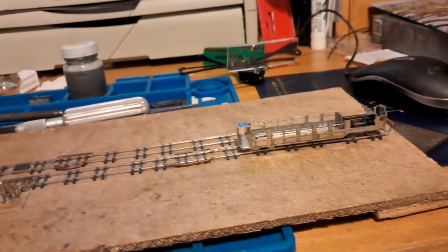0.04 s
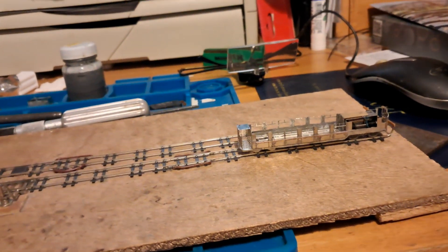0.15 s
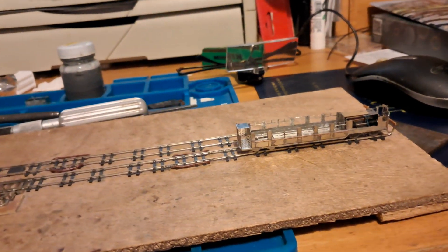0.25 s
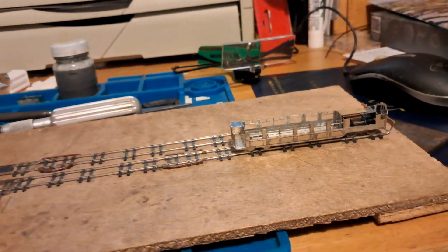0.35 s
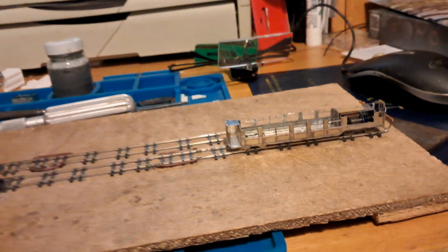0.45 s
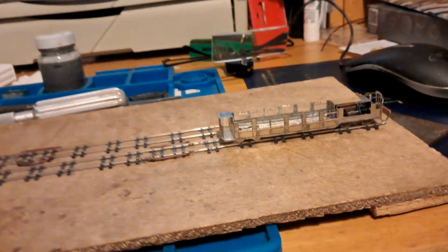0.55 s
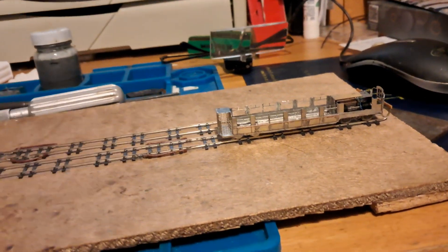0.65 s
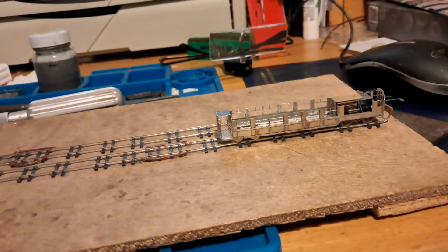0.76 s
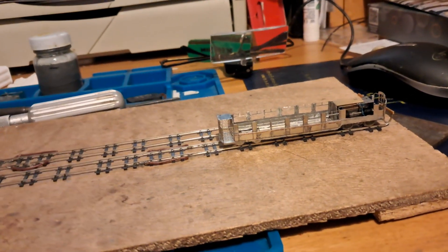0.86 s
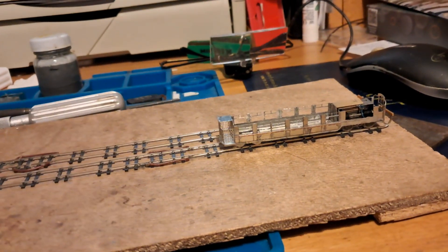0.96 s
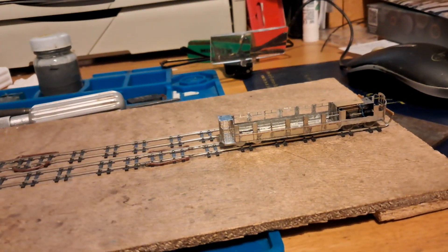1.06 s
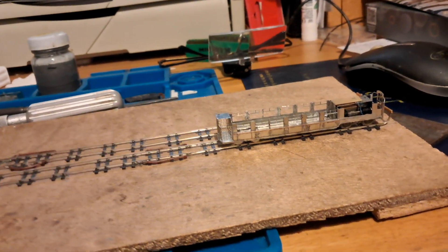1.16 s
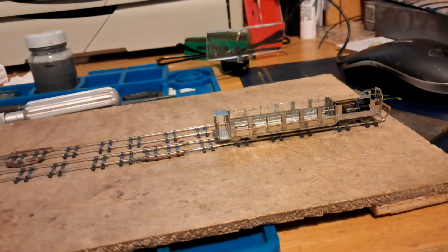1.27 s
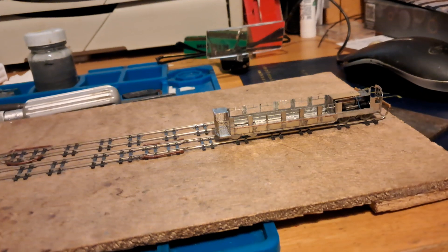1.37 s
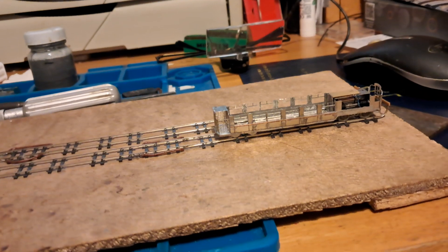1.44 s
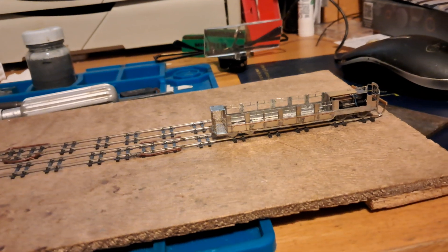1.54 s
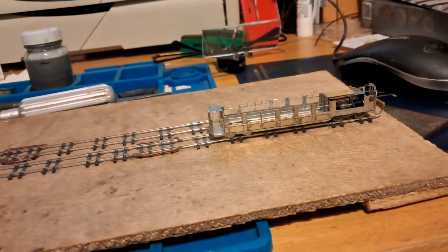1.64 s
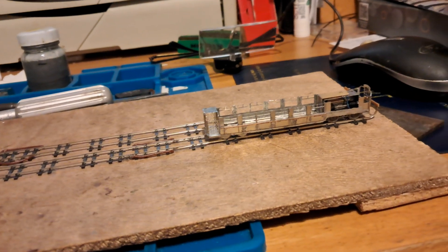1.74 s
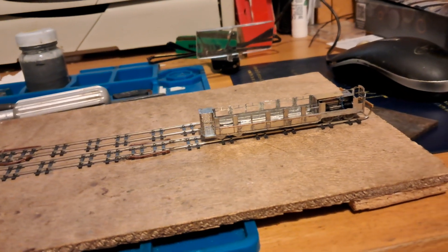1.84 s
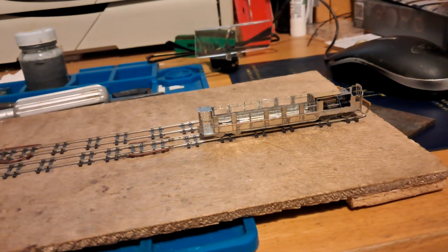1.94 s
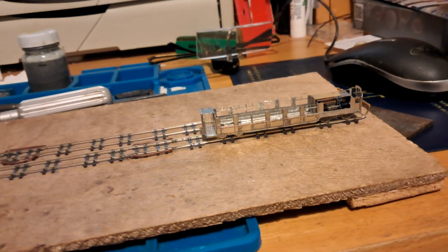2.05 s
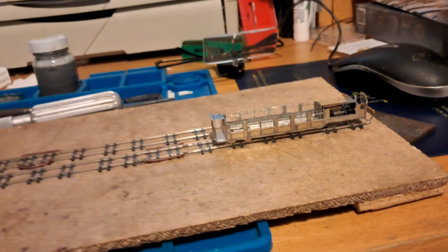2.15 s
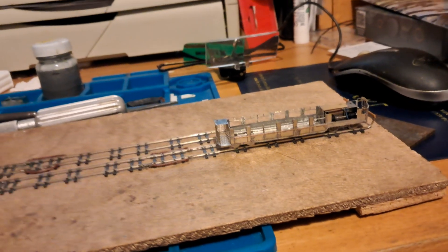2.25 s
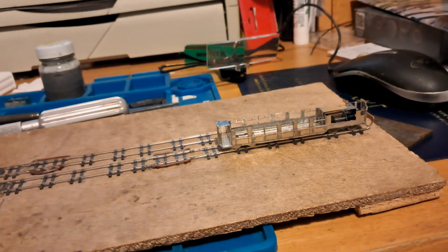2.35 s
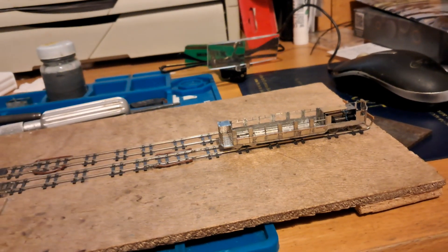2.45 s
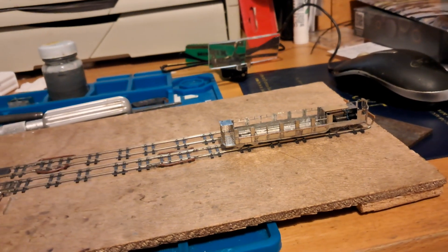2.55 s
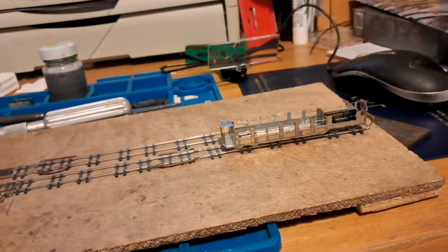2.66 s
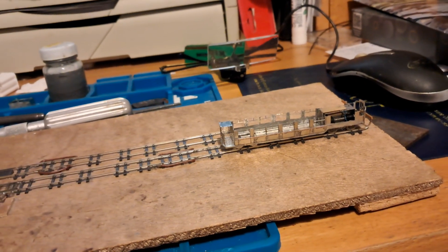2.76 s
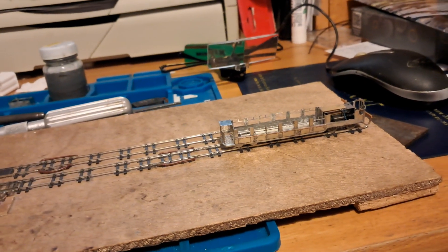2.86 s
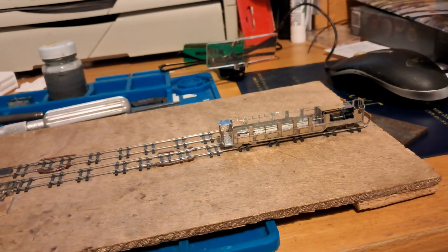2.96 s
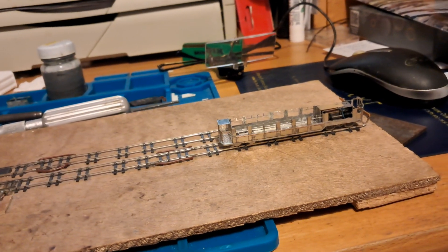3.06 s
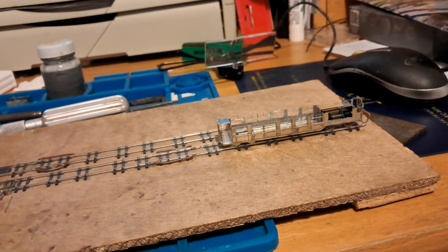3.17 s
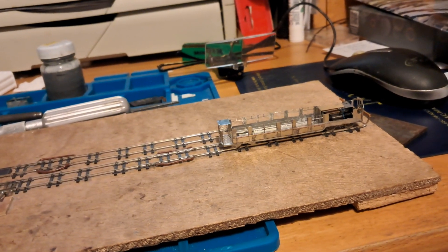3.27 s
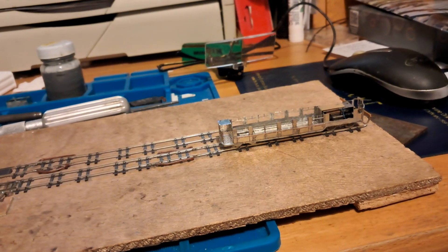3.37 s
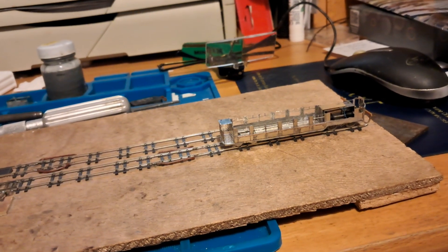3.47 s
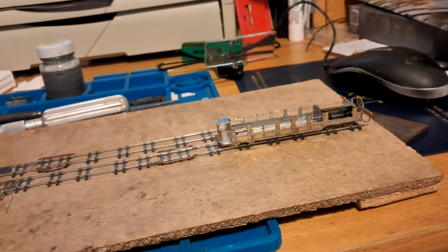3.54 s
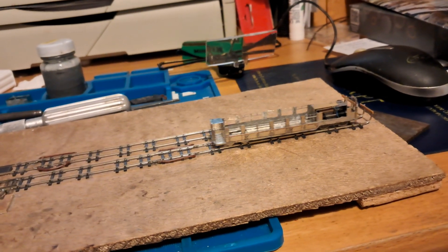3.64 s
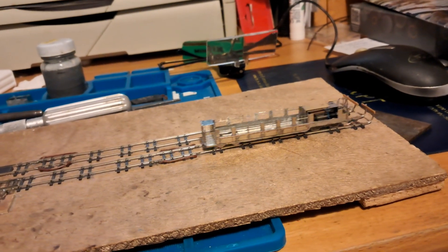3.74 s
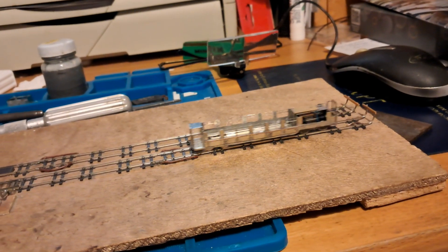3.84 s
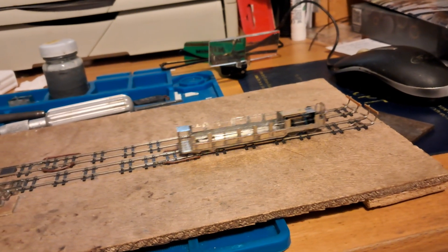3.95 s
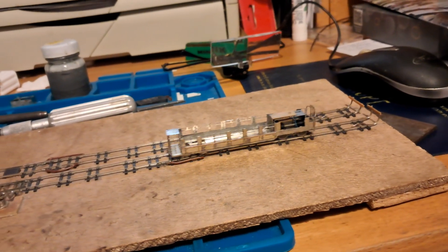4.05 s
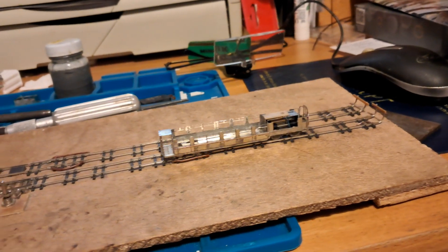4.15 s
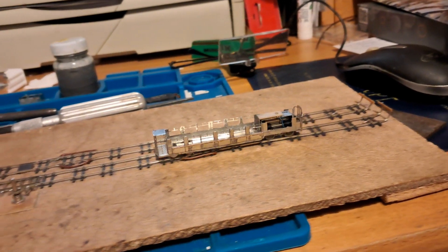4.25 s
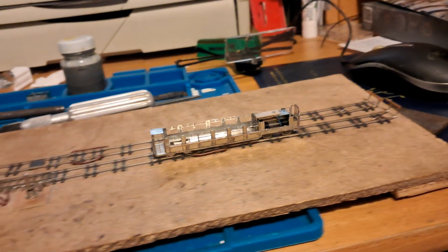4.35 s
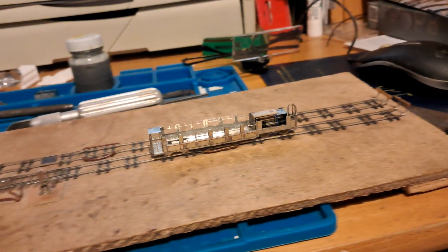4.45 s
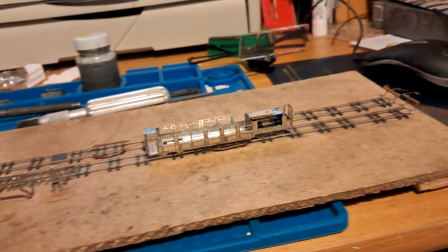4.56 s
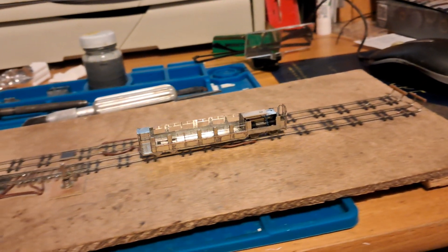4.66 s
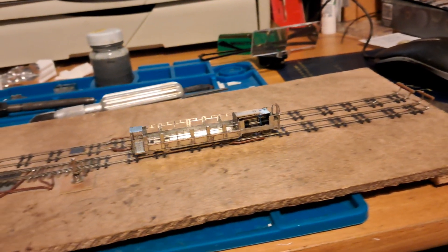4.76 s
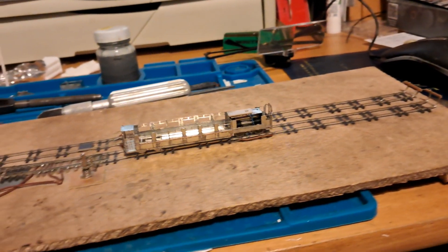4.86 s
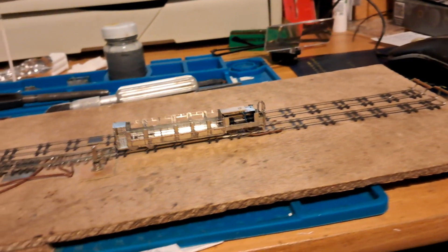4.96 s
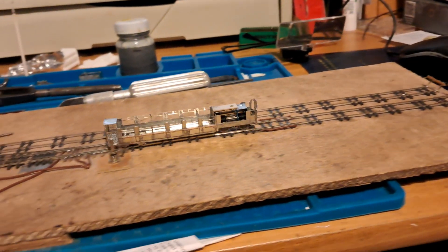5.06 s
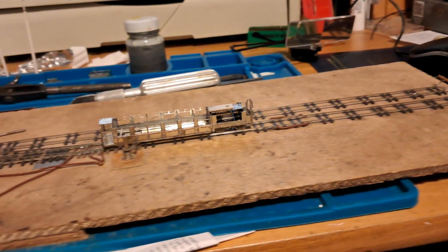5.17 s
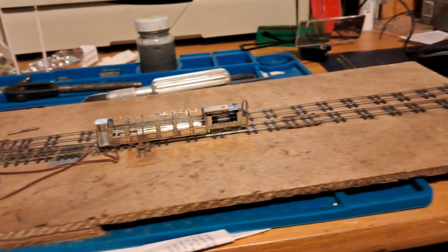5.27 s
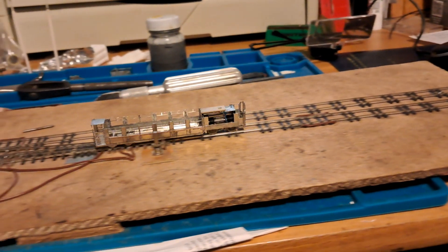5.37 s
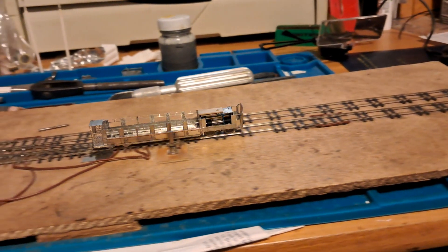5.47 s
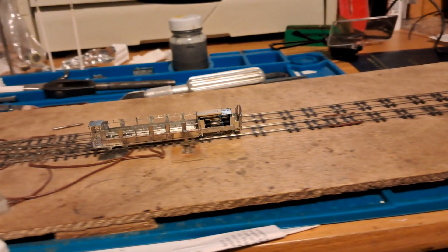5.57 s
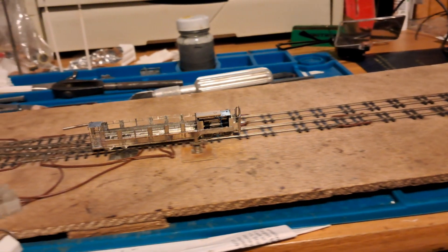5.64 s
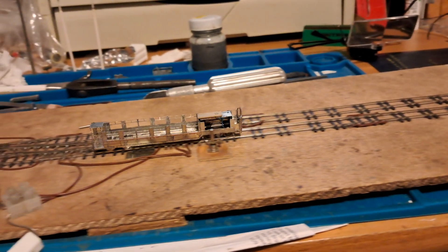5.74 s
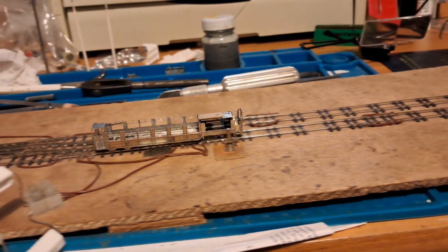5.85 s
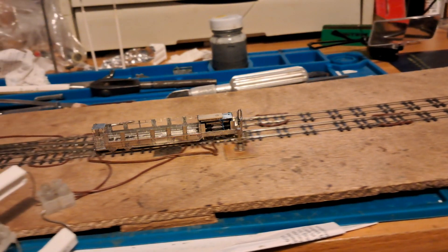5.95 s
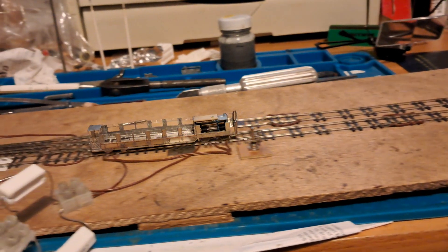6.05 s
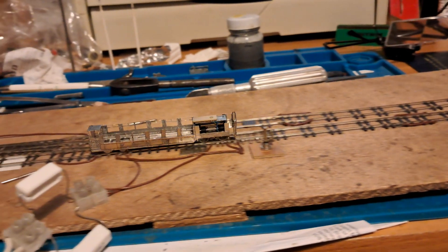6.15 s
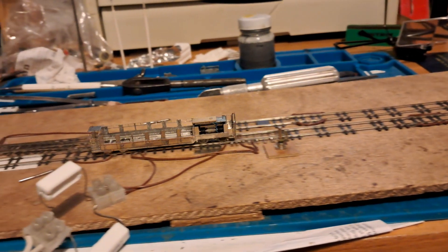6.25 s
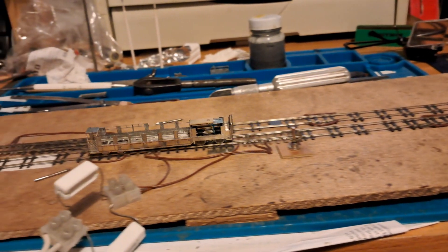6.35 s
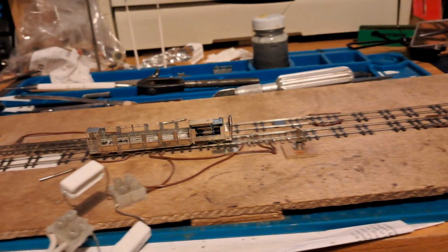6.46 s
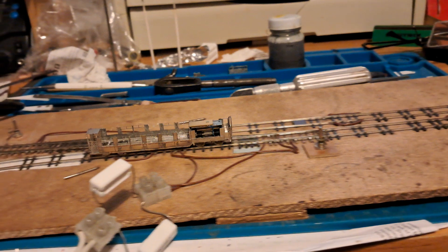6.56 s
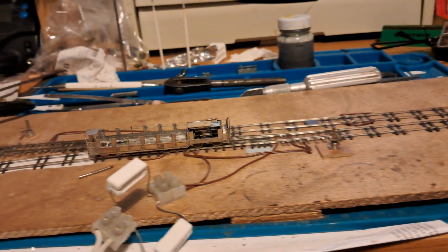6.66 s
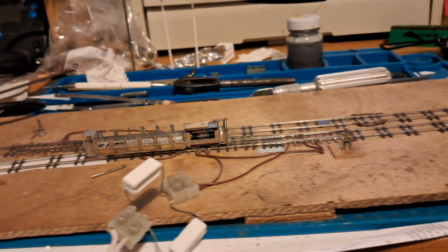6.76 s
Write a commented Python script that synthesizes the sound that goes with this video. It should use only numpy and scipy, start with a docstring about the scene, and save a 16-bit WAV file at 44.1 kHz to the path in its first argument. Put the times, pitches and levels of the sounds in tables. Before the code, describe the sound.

Two sharp switch clicks and faint touches on a controller break the low hum of a small room. A soft low tone passes briefly, then a model rail car sets off, heard from close by. Its little gears chatter in a steady, tinny whirr that resonates through the wooden board beneath, with high wheel hiss and small jolts. The running sound eases slightly midway, then grows fuller, drifting a little to the right.

```python
"""A small brass model rail car runs along its track on a wooden board, close by.
Backlash makes its gear teeth collide, driving the resonances of board, chassis and brass shell;
the wheels hiss by sliding friction, jolt over the rails and bind here and there.
Before the motor starts, a switch clicks twice, the controller is lightly handled and a soft low tone
passes. Behind it all lies a quiet workroom with a faint hum."""
import sys
import numpy as np
from scipy import signal
from scipy.fft import rfft, irfft
from scipy.io import wavfile
from scipy.ndimage import uniform_filter1d, map_coordinates

SR = 44100
rng = np.random.default_rng(int(sys.argv[2]) if len(sys.argv) > 2 else 0)


def unload_audio(sound):
    """Save the sound as a 16-bit wav file, at the path given as the first command line argument."""
    columns = np.transpose(np.atleast_2d(sound))
    # keep every value between -1 and 1, then stretch to whole-number steps
    steps = np.round(np.clip(columns, -1, 1) * 32767)
    wavfile.write(sys.argv[1], SR, steps.astype(np.int16))


N = 300321
T = np.arange(N) / SR
FFT_SIZE = 2 ** 19
HZ = np.maximum(np.fft.rfftfreq(FFT_SIZE, 1 / SR), 1)
MOTOR_START_S = 3.546
RUNNING_S = np.maximum(T - MOTOR_START_S, 0)

# How hard the gears work. Each row: time in seconds, relative level in dB.
GEAR_LOAD = [(3.6, -32), (3.89, -35), (4.09, -32.5), (4.51, -34.5), (4.54, -37.5), (4.86, -38.5),
             (5.16, -40), (5.39, -36), (5.57, -38), (6.01, -32.5), (6.58, -32), (6.76, -33)]
# The board answers more as the car rolls in from its end. Each row: time in seconds, gain in dB.
BOARD_COUPLING = [(3.6, -21), (4.0, -17), (4.25, -9.5), (4.9, -9.5), (5.55, -3.5), (6.15, -4.5), (6.8, -3)]
def rail_car(spin_up_s=0.027, dead_spot_s=5.14, dead_half_s=0.17, grit_db=-12, hiss_db=-42):
    """Forced vibration: one gear chatter drives every part of the car in step with the load."""
    (load_db,), (coupling_db,) = curves(GEAR_LOAD), curves(BOARD_COUPLING)
    # Over a dead spot the board hardly rings and the chassis is damped too.
    dead_spot = np.exp(-((T - dead_spot_s) / dead_half_s) ** 4)
    board_gain = undb(load_db + coupling_db - 11.5 * dead_spot)
    chassis_gain = undb(load_db - 6.5 - 15 * dead_spot)
    shell_gain = undb(load_db[0] + 1.038 * (load_db - load_db[0]) - 6)
    spin_up = np.clip(RUNNING_S / spin_up_s, 0, 1) ** 2
    chatter = gear_chatter() * spin_up
    gritty = chatter + undb(grit_db) * rail_grit() * spin_up
    thud, clink = wheel_jolts()
    ringing = ringing_parts(board_force=chatter * (board_gain + thud),
                            chassis_force=chatter * chassis_gain + clink * undb(-4),
                            shell_force=gritty * shell_gain + clink)
    hiss = wheel_hiss(gritty * undb(hiss_db) + clink * undb(-8))
    return ringing + hiss + bench_rumble(chatter, board_gain)


# The motor's speed. Each row: time in seconds, nominal turns per second.
MOTOR_SPEED = [(3.54, 48.2), (3.65, 100.7), (4.3, 104.2), (5.1, 117), (5.6, 102), (6.1, 107.5),
               (6.8, 103.2)]
def gear_chatter(teeth=12, backlash=.35, gear_ratio=5.2, shaft_db=3.5, wheel_db=1.8, room_db=-2):
    """Backlash: teeth strike early or late, harder once a motor turn and once a wheel turn."""
    speed, = curves(MOTOR_SPEED)
    turns = np.cumsum(speed * (1 + .03 * wander(14))) / SR
    tooth = np.arange(int(turns[-1] * teeth))
    late, strength, flank = rng.standard_normal((len(tooth), 3)).T
    hits = np.searchsorted(turns, (tooth + backlash * late) / teeth).clip(0, N - 1)
    blows = unit(np.bincount(hits, undb(4 * strength) * np.sign(flank), N))  # either flank may hit
    sliding = 0.7 * rng.standard_normal((2, N))
    angle = 2 * np.pi * turns
    pressure = undb(shaft_db * np.cos(angle) + wheel_db * np.cos(angle / gear_ratio))
    out = sliding * pressure
    # Paths to the ears and echo patterns crossfade as the car travels.
    travel = turns / 22
    for pace in (1, np.sqrt(3)):
        for wave in (np.cos, np.sin):
            direct = scatter(blows * pressure, delay_s=0.000902)
            echoes = undb(room_db) * room((blows + sliding[0]) * pressure)
            out += wave(travel * pace) / np.sqrt(2) * (direct + echoes)
    return spread(unit(out))


# Modes of the wooden board, the chassis and the brass shell.
# Each row: frequency in Hz, bandwidth in Hz, relative level in dB, left minus right in dB.
BOARD_MODES = [(515.7, 79, -24.5, 1), (644, 45, -20, 0), (758, 25, -10.5, 7), (871.5, 41.5, 2.5, 1.5),
               (976, 90, -7, 4.5)]
CHASSIS_MODES = [(1118, 6.7, 10, -4.5), (1210, 66, -0.5, -5.5), (1453, 71, 3.5, 1.5), (1398, 55, 3.5, 3),
                 (1518, 35, -7, 10), (1638, 98, 6, 3), (1770, 105, -28, -18), (1810, 40, -0.5, -9),
                 (2010, 200, -1.5, 4)]
SHELL_MODES = [(2254, 21, 3.5, -3), (2700, 120, 1.5, 10), (2810, 150, 1, 6), (3054, 160, 1.5, -2),
               (3403, 235, 0.5, 14), (3900, 610, -4, -17), (4580, 350, -0.5, 9), (4860, 180, 1.5, -13.5),
               (5370, 340, 0, -5), (6170, 450, 0, -1.5), (6760, 84, -3, 14)]
def ringing_parts(board_force, chassis_force, shell_force, pan_db_per_s=-1.43):
    """Modal resonance: each part rings at its natural frequencies, drifting right as the car runs."""
    drift_db = pan_db_per_s * RUNNING_S
    board = shape(board_force, modal_gain(BOARD_MODES)) * pan(3 + drift_db)
    chassis = shape(chassis_force, modal_gain(CHASSIS_MODES)) * pan(-2 + drift_db)
    shell = shape(shell_force, modal_gain(SHELL_MODES)) * pan(4.5 + drift_db)
    return board + chassis + shell


# Wheels and pick-ups sliding on the rails. Each row: frequency in Hz, relative level in dB.
HISS_SPECTRUM = [(5000, -34), (7500, -1), (8300, -10.5), (9300, 0), (10700, 3), (12300, 9), (13500, 2.5),
                 (14800, 8), (15700, 2.5)]
# Delay of the direct hiss at the right ear. Each row: time in seconds, lag in microseconds.
RIGHT_EAR_LAG = [(3.6, 45), (4.1, 1.8), (4.7, 11), (5.5, 47.5), (6.8, 50)]
def wheel_hiss(force, coherence=0.51):
    """Sliding friction: a high hiss whose direct part arrives with an interaural time difference."""
    lag_us, = curves(RIGHT_EAR_LAG)
    left, diffuse = force
    delayed = map_coordinates(left, [(T - lag_us / 1e6) * SR], mode="nearest")
    right = coherence * delayed + np.sqrt(1 - coherence ** 2) * diffuse
    return shape(np.array([left, right]), colour(HISS_SPECTRUM)) * pan(-1.7)


# Wheels jolting over the rails. Each row: start in seconds, relative thud and clink levels in dB.
WHEEL_JOLTS = [(3.602, -56, -31), (3.765, -36, -29), (3.922, -50, -25), (3.96, -50, -37), (4.051, -31, -28),
               (4.088, -59, -27), (4.098, -56, -25.5), (4.141, -50, -22), (4.239, -36, -27),
               (5.446, -54, -28.5), (5.719, -16.5, -47), (5.975, -32, -51.5), (6.025, -55, -29)]
def wheel_jolts(thud_db=-12, clink_db=5.5, room_db=-9):
    """Impact of hard wheel on hard rail: a thud envelope for the board and a short crack of noise."""
    thud = sum(undb(db + thud_db) * burst(s, fade_s=0.0048, rise_s=0.00026)
               for s, db, _ in WHEEL_JOLTS)
    clink = sum(undb(db + clink_db) * burst(s + .001, fade_s=0.0023, rise_s=0.00022)
                for s, db in [(start - .002, db) for start, _, db in WHEEL_JOLTS])
    crack = clink * rng.standard_normal((2, N))
    return thud, crack + undb(room_db) * room(crack[0])


def rail_grit(ticks_per_s=45, spread_db=3, room_db=-6):
    """Roughness excitation: uneven rails give the wheels sharp little ticks at random."""
    chance, strength = rng.random(N), rng.standard_normal(N)
    ticks = (chance < ticks_per_s / SR) * undb(spread_db * strength)
    return unit(scatter(ticks, delay_s=.0002) + undb(room_db) * room(ticks))


# Spells of binding. Each row: start and end in seconds, frequency in Hz, nominal bandwidth in Hz,
# relative level in dB, left minus right in dB.
WHEEL_BINDS = [(3.56, 4.275, 2836, 646, -38, 9.5), (3.633, 4.537, 1417, 105, -40.5, 3.5),
               (3.663, 4.957, 1192, 118, -43.5, -2.5), (4.07, 4.157, 5850, 1300, -36.5, 9.5),
               (4.045, 4.533, 6970, 430, -47, 12.5), (4.2, 4.54, 3474, 290, -41, 10),
               (4.242, 4.39, 5100, 900, -40.5, 5), (4.557, 5.69, 3460, 258, -48.5, 7.5),
               (4.687, 5.96, 1730, 190, -46, -6.5), (5.248, 5.503, 1790, 292, -41, -7),
               (5.9, 6.131, 5070, 1550, -37, 3), (5.88, 6.48, 2890, 400, -45, 3),
               (6.2, 6.304, 5970, 800, -43, -3), (6.306, 6.76, 4850, 499.8, -42, -5)]
def binding_wheels(level_db=-3.0, edge_s=0.053, waver_db=2):
    """Selective resonance: where the wheels bind, gear chatter sings unsteadily in one band."""
    chatter, out = gear_chatter(), 0
    for start, end, hz, width, db, side_db in WHEEL_BINDS:
        swell = np.clip(np.minimum(T - start + edge_s / 4, end - T + edge_s / 2) / edge_s, 0, 1)
        gain = undb(db + level_db + waver_db * wander(25))
        out += band(chatter, hz, width) * swell * gain * pan(side_db)
    return np.sqrt(2) * out


# The bench under the board. Each row: frequency in Hz, relative level in dB.
BENCH_SPECTRUM = [(25, -14), (60, -8), (100, -5), (135, -0.5), (220, 4.5), (320, 0), (450, 7), (700, -8.5),
                  (1200, -19)]
def bench_rumble(chatter, board_gain, level_db=-24.5):
    """Structure-borne sound: the bench shakes with the board, but its level varies less."""
    gain = np.sqrt(board_gain * board_gain[-1]) * undb(level_db)
    return shape(chatter * gain, colour(BENCH_SPECTRUM))


# Blows within the switch. Each row: time in seconds, relative level in dB, knock gain in dB,
# room gain in dB.
SWITCH_BLOWS = [(1.1836, -35.5, 2, 16), (1.2027, -22.5, 1, 15), (1.2048, -7.5, -14, 0),
                (1.4624, -0.5, -23, -8), (1.4651, -0.5, -13.5, 3.5), (1.473, -9, -15, -16),
                (1.7924, -27, -5, -1)]
# The switch's snap. Each row: frequency in Hz, relative level in dB.
SNAP_SPECTRUM = [(300, -14), (900, -23), (1700, -34), (2400, -15), (3600, 2.5), (5000, 0), (6800, 6.5),
                 (8300, -12), (10500, -4), (13000, 5), (15700, 1.5)]
# Modes of the controller's hollow case.
# Each row: frequency in Hz, bandwidth in Hz, relative level in dB, left minus right in dB.
CASE_MODES = [(855, 83, 3.5, 3), (1730, 220, 1, -10), (3120, 940, -11, 19)]
def switch(level_db=-22, direct_db=2, side_db=7):
    """Impulse response: a switch off to the left snaps and knocks on its case; the room answers."""
    direct, to_room = np.zeros((2, 2, N))
    for s, db, knock_db, room_db in SWITCH_BLOWS:
        blow = undb(db + level_db + np.array([0, knock_db]))  # snap, knock
        direct[:, int(s * SR)] += blow
        to_room[:, int(s * SR)] += blow * undb(room_db)
    snap, knock = (spread(scatter(near, delay_s=.0001) * undb(direct_db) * pan(side_db) + room(far))
                   for near, far in zip(direct, to_room))
    return shape(snap, colour(SNAP_SPECTRUM)) + shape(knock, modal_gain(CASE_MODES))


# Touches on the controller. Each row: start in seconds, relative level in dB, centre frequency in Hz,
# decay time in seconds.
HAND_SCUFFS = [(.05, -73, 815, 0.18), (0.519, -75.5, 2880, .03), (.554, -69, 5550, .045),
               (0.722, -67.5, 5850, 0.0091), (1.29, -76.5, 840, 0.23), (1.581, -72.5, 5660, 0.033),
               (2.2, -68, 1000, .016), (2.42, -77, 1510, 0.37), (2.536, -75, 2400, 0.013),
               (2.758, -71.5, 5300, 0.014)]
def handling(relative_width=0.4, room_db=-6):
    """Friction noise: light handling makes faint scuffs, each in its own band."""
    scuffs = 0
    for s, db, hz, fade_s in HAND_SCUFFS:
        noise = band(rng.standard_normal(N), hz, relative_width * hz)
        scuffs += undb(db) * noise * burst(s, fade_s, rise_s=0.0019)
    return spread(scatter(scuffs, delay_s=.0001) + undb(room_db) * room(scuffs))


def low_tone(peak_s=3.24, hz=345, glide_hz_per_s=250, rise_db_per_s=116, fall_db_per_s=228):
    """Random modulation roughens a soft low tone that swells and fades as its pitch creeps up."""
    age = T - peak_s
    level_db = -58.5 + np.minimum(rise_db_per_s * age, -fall_db_per_s * age)
    pitch = (hz + glide_hz_per_s * age) * (1 + 0.045 * wander(92))
    phase = 2 * np.pi * np.cumsum(pitch) / SR
    tone = np.sqrt(2) * (np.sin(phase) + 0.079 * np.sin(2 * phase))
    return tone * undb(level_db + 5.5 * wander(69.6))


# The quiet room. Each row: frequency in Hz, relative spectral density in dB.
AIR_SPECTRUM = [(25, -20.5), (62, -1), (140, 2), (170, -1), (240, 0.5), (330, -3), (800, -4.5),
                (1100, -11.5), (1600, -11.5), (2500, -21), (6400, -28), (8300, -38.5), (12300, -23),
                (15700, -24.5)]
# The room's hum. Each row: frequency in Hz, bandwidth in Hz, level in dB before stereo spreading.
HUM_BANDS = [(200, 3.7, -77.5), (224, 16.7, -74), (481, 26, -84.5), (782, 15, -82.5), (843, 10, -89.5),
             (1480, 350, -88)]
def workroom(air_db=-72.5):
    """Stationary noise: a broad band is heard as still air, narrow bands as a faint, wavering hum."""
    air = shape(spread(rng.standard_normal((2, N))), colour(AIR_SPECTRUM)) * undb(air_db)
    hum_power = sum((undb(db) * unit(resonance(hz, width))) ** 2 for hz, width, db in HUM_BANDS)
    hum = shape(spread(rng.standard_normal((2, N))), np.sqrt(hum_power))
    return air + hum * np.sqrt(np.mean(hum_power))


def room(x, t60_s=0.19, treble_t60_s=0.13, build_s=0.0061):
    """Reverberation: echoes build up quickly in a small furnished room and the treble dies first."""
    t = T[:SR // 3]
    noise = rng.standard_normal((2, len(t)))
    low = signal.sosfilt(signal.butter(1, 2500, fs=SR, output="sos"), noise)
    tail = low * undb(-60 * t / t60_s) + (noise - low) * undb(-60 * t / treble_t60_s)
    onset = 1 - np.exp(-(t / build_s) ** 2)
    response = unit(tail * onset) / np.sqrt(len(t))
    return signal.fftconvolve(np.atleast_2d(x), response, axes=1)[:, :N]


# How much the two ears differ. Each row: frequency in Hz, side gain relative to mid in dB.
STEREO_WIDTH = [(40, 7), (130, -11), (400, -6), (900, -6.5), (1200, 0.5), (16000, -1)]
def spread(pair):
    """Interaural coherence: left and right grow alike from the upper bass to about 1 kHz."""
    mid = (pair[0] + pair[1]) / np.sqrt(2)
    side = irfft(rfft(pair[0] - pair[1], FFT_SIZE) * colour(STEREO_WIDTH))[:N] / np.sqrt(2)
    return np.array([mid + side, mid - side])


def scatter(x, delay_s):
    """Group delay: each frequency leaves a small object a little late, differently to each side."""
    knots = np.linspace(0, SR / 2, num=90)
    delay = np.array([np.interp(HZ, knots, d) for d in rng.exponential(delay_s, (2, len(knots)))])
    phase = 2 * np.pi * np.cumsum(delay, axis=1) * SR / FFT_SIZE
    return irfft(rfft(x, FFT_SIZE) * np.exp(-1j * phase))[:, :N]


def shape(x, gain):
    """Minimum-phase filtering by a gain curve, scaled so that white noise keeps its power."""
    cepstrum = irfft(np.log(unit(gain) + 1e-6))
    cepstrum[..., 1:FFT_SIZE // 2] *= 2
    cepstrum[..., FFT_SIZE // 2 + 1:] = 0
    return irfft(rfft(x, FFT_SIZE) * np.exp(rfft(cepstrum)))[..., :N]


def modal_gain(modes):
    """Power summation of modes into left and right gain curves."""
    return np.sqrt(sum((undb(db) * pan(side_db) * resonance(hz, width)) ** 2
                       for hz, width, db, side_db in modes))


def resonance(hz, width):
    """Resonance curve with skirts that steepen away from the peak."""
    detuning = ((HZ / hz - hz / HZ) * hz / width) ** 2
    return 1 / np.sqrt((1 + detuning) * (1 + detuning / 60))


def band(x, hz, width):
    """Two resonators in cascade; the result has rms 1."""
    b, a = signal.iirpeak(min(hz, .45 * SR), hz / width, fs=SR)
    return unit(signal.lfilter(b, a, signal.lfilter(b, a, x)))


def colour(points):
    """Spectral envelope: gain at each frequency from (Hz, dB) points."""
    hz, db = np.transpose(points)
    return undb(np.interp(np.log(HZ), np.log(hz), db))


def burst(start_s, fade_s, rise_s):
    """Envelope with exponential rise and decay."""
    age = np.maximum(T - start_s, 0)
    return (1 - np.exp(-age / rise_s)) * np.exp(-age / fade_s)


def wander(rate_hz):
    """Smoothed random steps with a spread near 1."""
    hold = int(SR / rate_hz)
    steps = np.repeat(rng.standard_normal(N // hold + 1), hold)
    return 1.3 * uniform_filter1d(uniform_filter1d(steps, hold), hold)[:N]


def curves(rows):
    """Linear interpolation of each column of a timed table."""
    times, *columns = np.transpose(rows)
    return [np.interp(T, times, column) for column in columns]


def pan(db):
    """Left and right gains for an interaural level difference."""
    return undb(np.array([[.5], [-.5]]) * db)


def undb(db):
    """Decibels to amplitude ratio."""
    return 10 ** (np.asarray(db) / 20)


def unit(x):
    """Normalisation to rms 1."""
    return x / np.sqrt(np.mean(x ** 2))


def scene():
    """Superposition of the car, its controller and the room."""
    return rail_car() + binding_wheels() + switch() + handling() + low_tone() + workroom()


def record(dry, top_hz=15800):
    """Band limiting: the microphone cuts off above its top frequency."""
    return signal.sosfilt(signal.ellip(10, .2, 70, top_hz, fs=SR, output="sos"), dry)


dry = scene()
out = record(dry)
unload_audio(out)
```